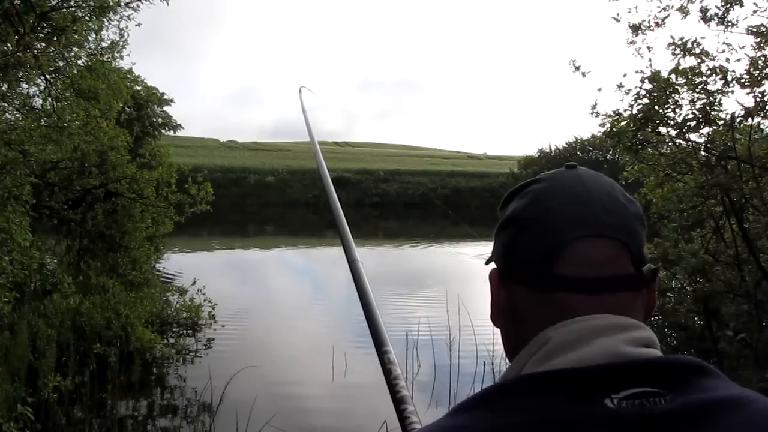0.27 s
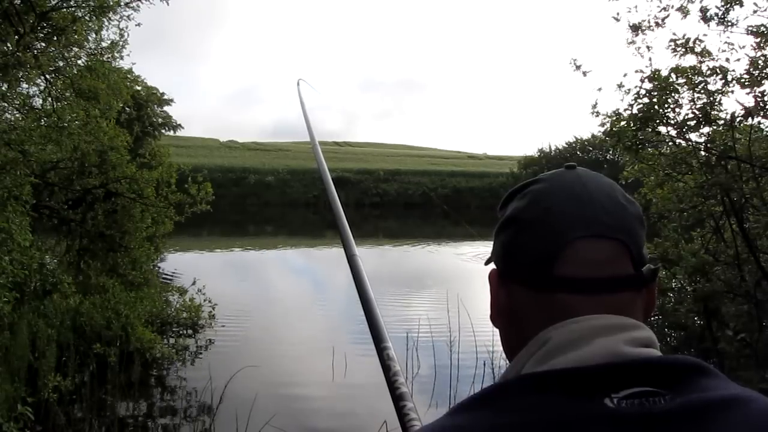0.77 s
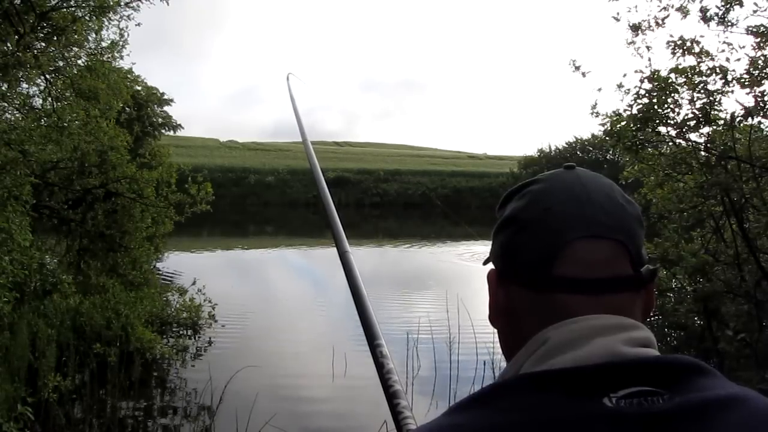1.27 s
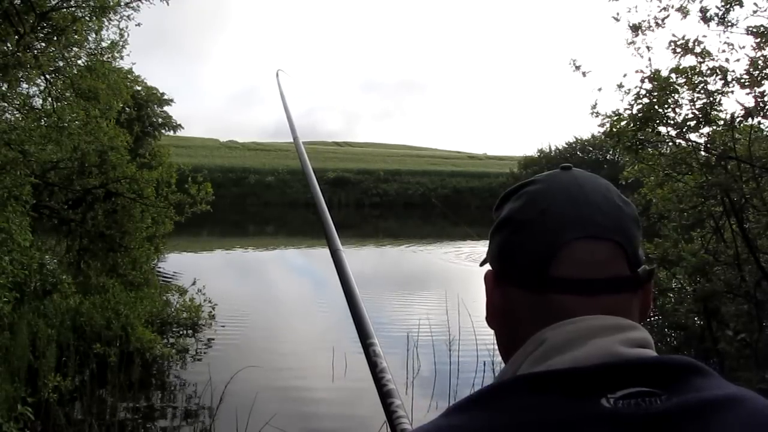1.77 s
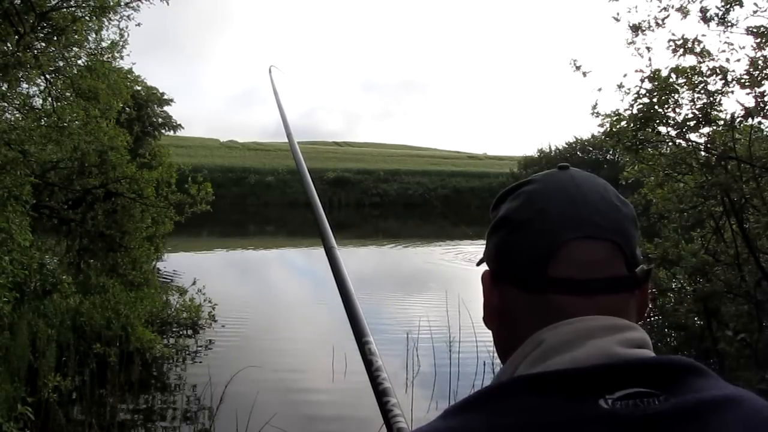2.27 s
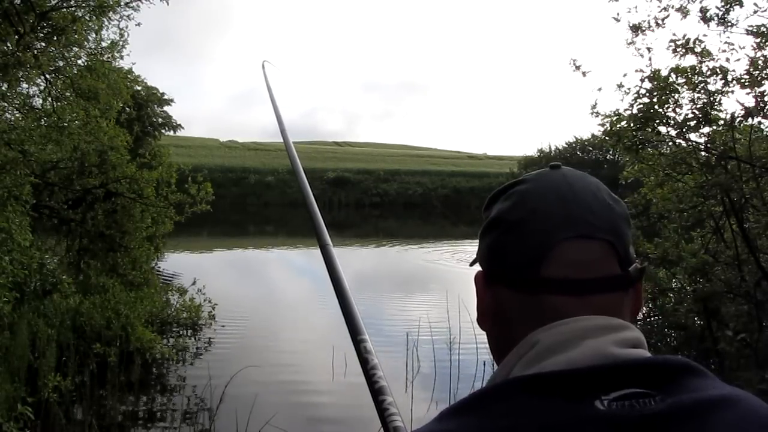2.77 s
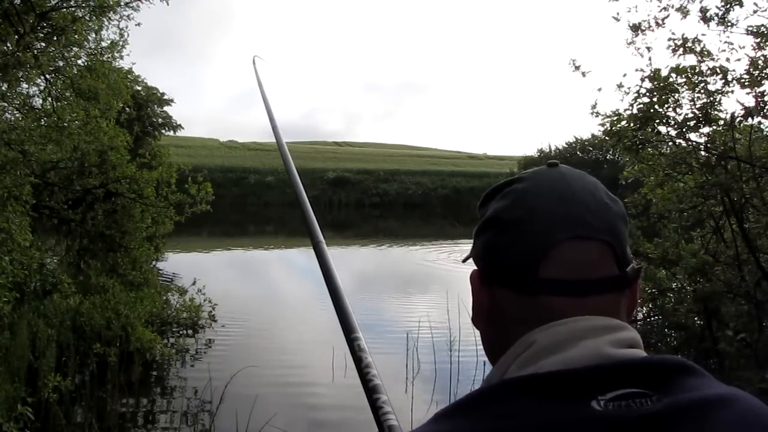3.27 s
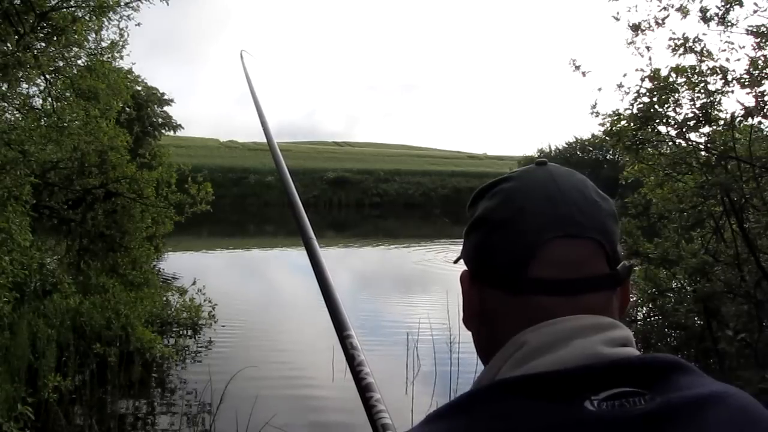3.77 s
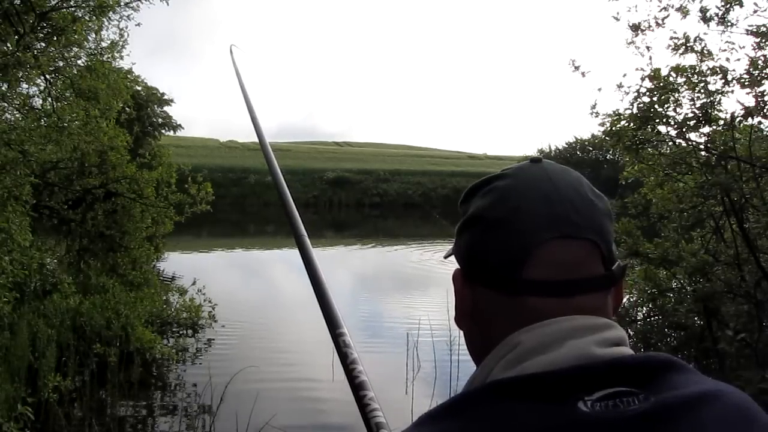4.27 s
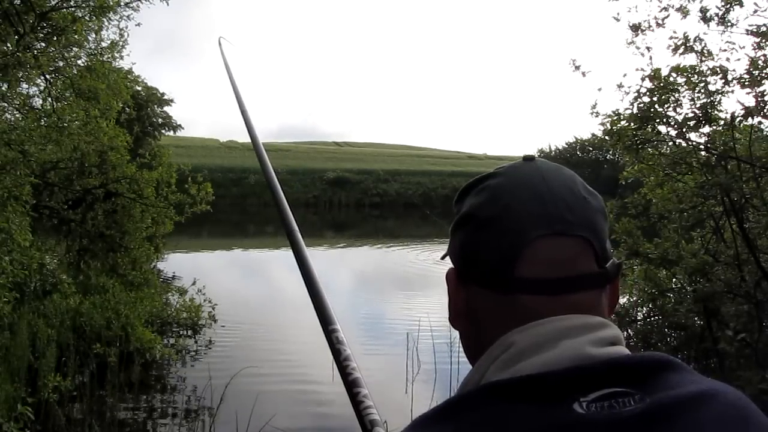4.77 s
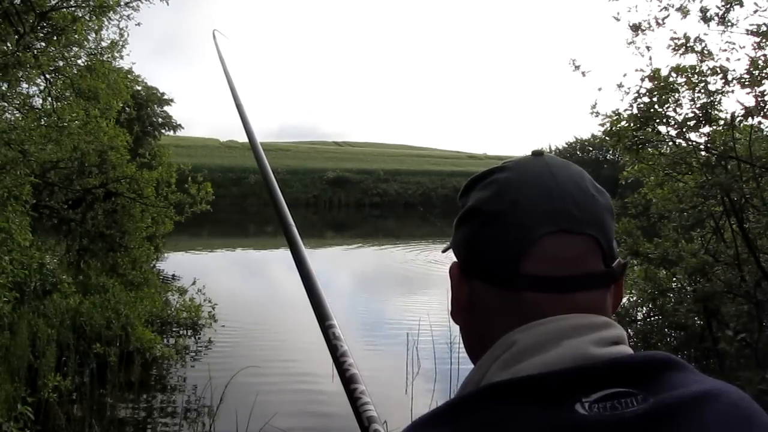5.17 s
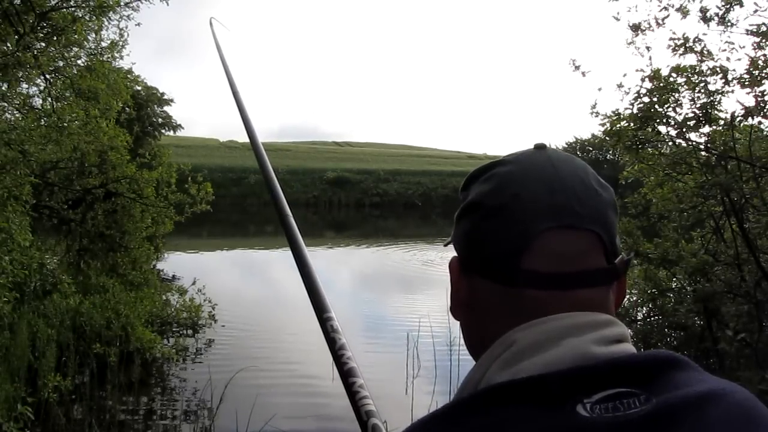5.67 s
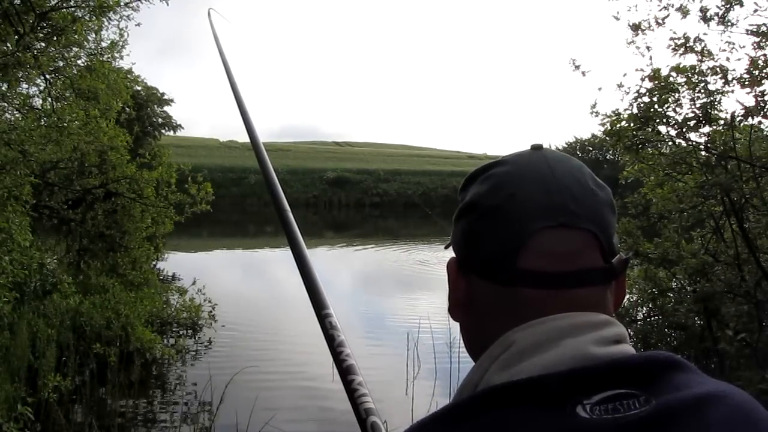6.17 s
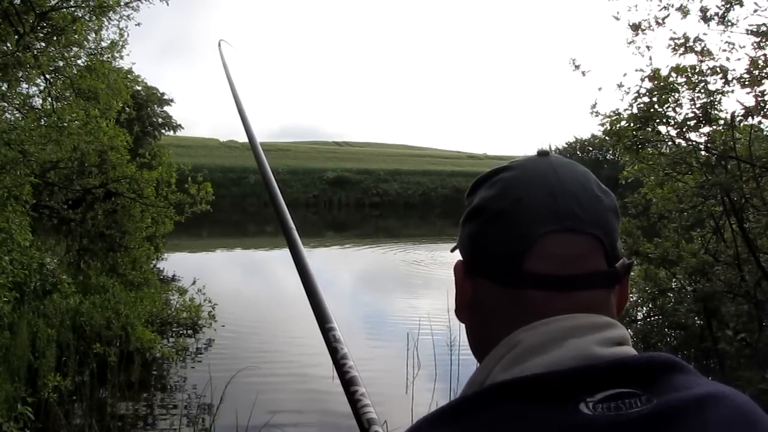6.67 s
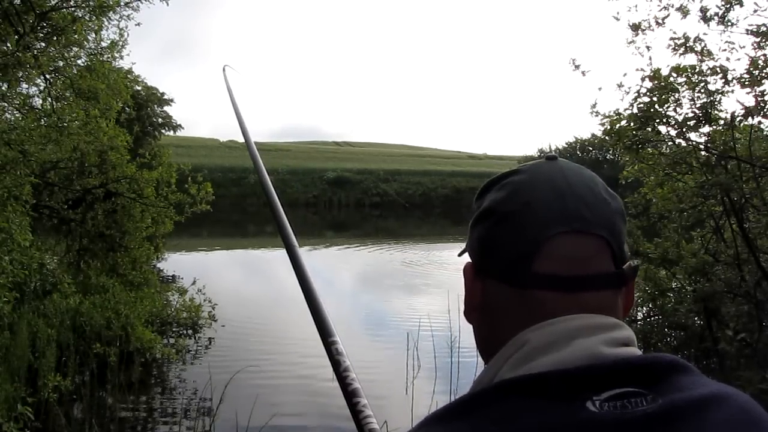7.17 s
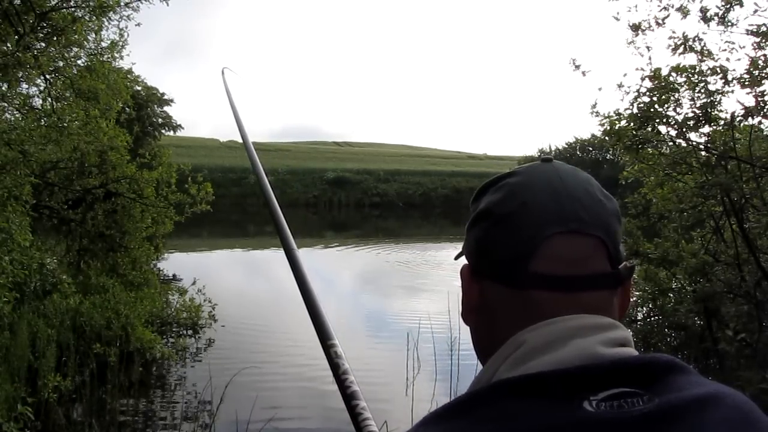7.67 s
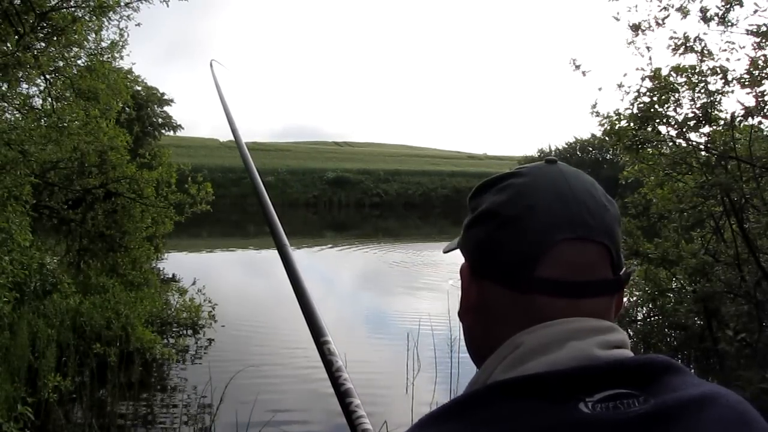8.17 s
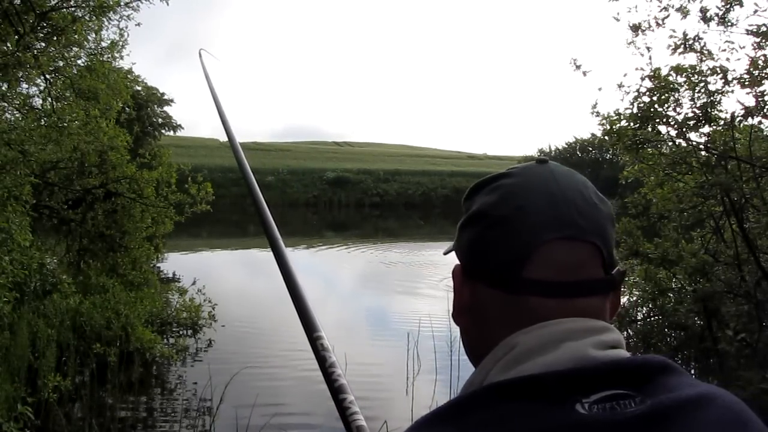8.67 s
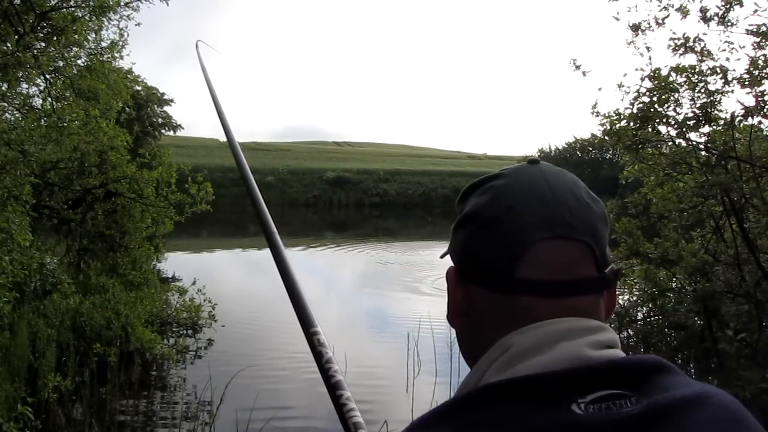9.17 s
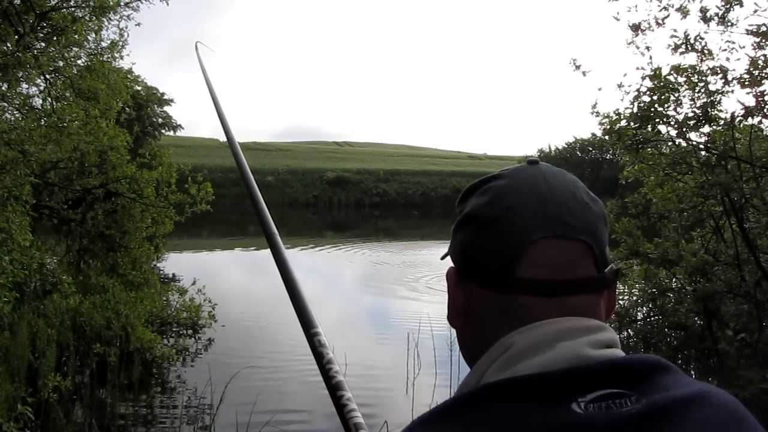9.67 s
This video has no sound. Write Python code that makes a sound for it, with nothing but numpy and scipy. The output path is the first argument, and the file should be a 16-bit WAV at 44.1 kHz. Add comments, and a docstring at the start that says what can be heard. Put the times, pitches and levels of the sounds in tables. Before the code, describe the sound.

Outdoors by a tree-lined pond, a skylark keeps up quick chips, buzzes and sliding whistles while a great tit alternates two notes and a blackbird flutes far off. At about six seconds bait slaps the water in a short crackling shower with small plops. Then a warbler sings louder and nearer on the right. Soft distant air and faint traffic lie beneath, in wide natural stereo.

```python
"""A skylark pours out buzzes and sweeps: near-pure tones whose pitch bends and whose buzzes are modulated.
A warbler sings close by on the right, a great tit alternates two whistles and a blackbird flutes far off, all
by the same tone model; random echoes stand for leaves and the far bank. Bait patters into the water as noise
bursts, droplet clicks and ringing air pockets. Filtered noise and faint drones make the distant air and traffic."""
import sys
import numpy as np
from scipy import signal
from scipy.fft import rfft, irfft, next_fast_len
from scipy.io import wavfile
from scipy.ndimage import map_coordinates

SR = 44100
rng = np.random.default_rng(int(sys.argv[2]) if len(sys.argv) > 2 else 0)


def materialize(psi):
    """Save the field psi as 16-bit PCM at rate SR to the path in sys.argv[1].

    A 1-D psi becomes a single channel; in a 2-D psi each row is a channel.
    """
    bounded = np.clip(np.atleast_2d(psi).T, -1, 1)
    quanta = np.round(bounded * 32767).astype(np.int16)
    wavfile.write(sys.argv[1], SR, quanta)


N = 437913
TIME = np.arange(N) / SR
TOP_HZ = 15700

# Levels in the tables are relative: each source applies its own gains, and echoes, afterwards.
# Spectrum of distant air and traffic: (frequency [Hz], relative density [dB])
AIR_SPECTRUM = [(15, -30), (28, -6), (55, 1.5), (90, -1.5), (135, -2), (230, -7), (480, -2), (1180, 1),
                (1420, -4), (2200, -7), (5200, -11.5), (6200, -17), (10500, -21.5), (15500, -29)]
# Stereo width of the air: (frequency [Hz], side minus mid [dB])
AIR_WIDTH = [(60, -11.5), (200, -6), (400, -9), (700, -5.5), (1300, -3), (2400, -2.5), (4400, 5),
             (8000, -1), (15000, -0.5)]
# Far engines: (start [s], end [s], frequency [Hz], level [dB], frequency wander [Hz])
DRONES = [(-1, 1.8, 256, -56.5, 1), (6.5, 9.9, 68, -52, 2.87), (1.5, 13, 1230, -57, 2.8),
          (2, 10.3, 990, -59, 4.1)]

# Thrushes in the far woods, level over time: (time [s], level [dB])
FAR_WOODS_LEVEL = [(0, -46), (2.6, -50), (3.3, -82), (4.8, -62), (5.3, -48.5), (7, -43.5), (8.3, -49.5),
                   (9.9, -45.5)]
# Small birds repeating one pip:
# (time [s], pips [count], rate [1/s], start pitch [Hz], middle pitch [Hz], end pitch [Hz], level [dB])
PIP_RUNS = [(9.175, 5, 11.8, 5800, 5500, 5500, -48.5), (9.54, 3, 15, 4200, 5400, 4100, -55),
            (4.2, 2, 6, 3900, 5500, 3100, -54), (4.785, 3, 4.8, 6000, 5700, 5800, -54),
            (2.1, 5, 36, 2750, 2620, 2400, -41)]

# Distant blackbird, its clearest notes: (time [s], length [s], pitch [Hz], level [dB])
BLACKBIRD_NOTES = [(1.01, 0.16, 1887, -42.5), (1.128, .1, 3077, -43.5), (1.25, 0.052, 2500, -40.5),
                   (1.339, .076, 2900, -36.5), (1.408, 0.056, 3210, -39), (1.489, .038, 2567, -37.5),
                   (1.52, 0.092, 2810, -38), (2.15, 0.12, 2815, -41), (5.235, 0.053, 1804, -44),
                   (5.344, .035, 2326, -38.5), (7.403, .28, 2280, -44.5), (8.228, 0.045, 2700, -39),
                   (8.312, 0.065, 1978, -43), (9.544, 0.03, 1800, -39.5)]
# Its softer fluting phrases: (start [s], end [s], central pitch [Hz], level [dB])
BLACKBIRD_PHRASES = [(.15, .7, 2300, -46.5), (1.95, 2.5, 1944, -46), (2.95, 3.5, 2530, -45.5),
                     (7.15, 8.15, 1847, -47.5), (8.8, 9.25, 1996, -44.5)]

# Great tit, low and high whistles in turn:
# (time [s], notes [count], first note [0 low, 1 high], low note level [dB], high note level [dB])
TIT_PHRASES = [(.15, 7, 0, -34, -36.5), (6.625, 11, 1, -33.5, -39)]
TIT_LOW_HZ, TIT_HIGH_HZ = 3773, 5284
TIT_PAIR_S, TIT_HIGH_DELAY_S, TIT_LOW_S, TIT_HIGH_S = .372, .147, 0.0786, 0.069

# Lumps of bait slapping the water:
# (time [s], peak level [dB], starting ring [Hz], level of the drops that follow [dB])
SLAPS = [(6.021, -13.5, 1940, -43.5), (6.162, -30, 1700, -32), (6.273, -17, 1880, -29),
         (6.364, -21.5, 1520, -36), (6.389, -17, 1980, -34), (6.421, -18, 3000, -38),
         (6.543, -28, 2530, -48), (6.640, -17, 2500, -30.5), (6.654, -25, 2430, -47)]
# Air pockets ringing in the water: (time [s], starting pitch [Hz], peak level [dB])
PLOPS = [(6.021, 1090, -30), (6.161, 1614, -22), (6.176, 390, -31.5), (6.196, 320, -35), (6.27, 446, -33),
         (6.286, 386, -36), (6.362, 1370, -22), (6.421, 530, -33), (6.596, 460, -30.5), (8.89, 577, -29.5)]
# Spectrum of the slap's noise burst: (frequency [Hz], gain [dB])
SLAP_COLOUR = [(200, -23), (600, -16), (1000, 0.5), (2400, 5.5), (3800, -1), (6000, -17), (15000, -32)]
# Spectrum of the falling drops: (frequency [Hz], relative gain [dB])
SPLASH_COLOUR = [(150, -52), (320, -4), (700, -1.5), (1500, 3.5), (2500, 3.5), (4000, -4), (7000, -50),
                 (15000, -37)]
# Spectrum of the fine spray: (frequency [Hz], relative gain [dB])
SPRAY_COLOUR = [(1500, -17), (4000, -1), (6500, -0.5), (10000, -6), (15000, -16)]
DROPS_DECAY_S, PLOP_S = 0.019, 0.037
# The cloud of loose crumbs lands in one swell; the spray peaks briefly within it.
CRUMBS_AT_S, CRUMBS_SPREAD_S, CRUMBS_DB = 6.395, 0.16, -33
SPRAY_AT_S, SPRAY_SPREAD_S, SPRAY_DB, SPRAY_BURST_DB = 6.402, 0.02, -9.5, 11.5

# Near warbler, plain notes: (time [s], length [s], pitch [Hz], glide [octaves], level [dB])
WARBLER_NOTES = [(7.864, .018, 2800, 0.5, -27.5), (7.876, 0.091, 2900, -0.046, -26),
                 (7.968, 0.067, 2230, -1.1, -28), (8.764, 0.016, 2200, 0.26, -31),
                 (8.782, .016, 2810, -0.27, -22.5), (8.966, .036, 2553, -0.016, -20),
                 (9.796, 0.021, 5120, 0.26, -32), (9.848, 0.092, 2545, .02, -20)]
# Its scratchy notes: (time [s], length [s], pitch [Hz], glide [octaves], level [dB], warble rate [Hz])
WARBLER_BUZZES = [(8.6, 0.052, 6000, 0, -34, 139), (8.673, 0.053, 5900, -0.041, -33.5, 142),
                  (8.802, .1, 4050, .7, -30, 133.5), (8.997, .032, 2340, -.14, -28, 210),
                  (9.025, .036, 2806, 0.46, -28, 192), (9.055, .046, 3520, 0.09, -27, 165),
                  (9.6, 0.052, 2210, -.06, -25, 76.4)]
# Its hooked note, down and up again:
# (delay [s], length [s], start pitch [Hz], middle pitch [Hz], end pitch [Hz])
HOOK = [(0, .039, 3400, 2650, 3600)]
# Occurrences of the hooked note: (time [s], level [dB])
HOOK_CALLS = [(7.372, -31.5), (8.342, -24.5), (8.495, -24)]
# Its trill, loud falling chips with a soft lead-in between:
# (time [s], chips [count], rate [1/s], start pitch [Hz], middle pitch [Hz], end pitch [Hz], level [dB])
WARBLER_TRILL = [(9.183, 4, 11.93, 3910, 2740, 2170, -23), (9.25, 3, 11.7, 3310, 2880, 2720, -35)]
# Colour of its voice, weak below 2 kHz: (frequency [Hz], gain [dB])
WARBLER_COLOUR = [(1500, -11), (2200, 2), (2700, 0.5), (3300, 2.5), (4000, 1), (5500, 2.5)]
SCRATCH_DEPTH_HZ, SCRATCH_AT_HZ, SCRATCH_POWER = 511, 4360, 1.84  # the warble widens with pitch

# Skylark chips, all one quick downward flick: (time [s], pitch [Hz], level [dB])
CHIPS = [(.056, 4850, -38.5), (.655, 3330, -35.5), (.78, 3310, -33.5), (1.815, 4820, -36.5),
         (1.897, 4380, -31), (2.012, 4500, -37.5), (2.11, 4680, -39), (2.5, 3580, -36), (3.345, 3750, -35),
         (3.665, 3290, -37.5), (4.58, 4700, -36), (4.692, 4790, -37), (8.455, 4400, -36),
         (9.773, 4480, -34)]
CHIP_S, CHIP_OCTAVES = .023, -0.492
# Stretches of softer chips at chance moments: (start [s], end [s], central pitch [Hz], level [dB])
SOFT_CHIPS = [(2.2, 2.7, 3185, -37.5), (3.35, 4.1, 3910, -43.5), (4.48, 5.1, 4200, -41)]
# Skylark slurred whistles: (time [s], length [s], pitch [Hz], glide [octaves], level [dB])
SLURS = [(0.322, 0.076, 3730, -0.47, -41.5), (1.15, 0.071, 3690, -.06, -42), (0.863, .1, 4340, -0.45, -39),
         (1.961, 0.14, 3284, 0.1, -36.5), (2.212, .16, 3850, 0.26, -39), (2.364, .06, 3340, -0.21, -35.5),
         (2.46, 0.019, 3900, -0.072, -34.5), (2.865, .12, 3430, 0.46, -36.5),
         (2.878, 0.025, 2505, 0.31, -32.5), (3.162, 0.023, 2600, 0.64, -35.5),
         (3.874, .089, 3590, -.46, -41.5), (4.022, .062, 3450, -.5, -46.5),
         (4.189, .125, 4013, -.27, -40.5), (5.031, .025, 4430, .03, -39), (5.05, .072, 3540, -.4, -41.5),
         (6.139, 0.072, 3980, -.63, -36), (6.451, 0.053, 3630, -.32, -30.5), (7.69, 0.025, 5600, 0.16, -37),
         (1.988, 0.042, 6230, 0.18, -40.5), (2.744, .055, 5360, 0.11, -40.5),
         (5.313, .04, 2620, -.28, -39.5), (6.203, .04, 2980, -0.356, -34), (6.76, 0.036, 5500, -0.047, -38)]
# Skylark slow rough churrs: (time [s], length [s], pitch [Hz], glide [octaves], level [dB])
CHURRS = [(3.6, .23, 3560, -0.092, -42), (4.762, .1, 3250, 0.276, -37), (4.83, 0.116, 3770, .08, -34.5)]
CHURR_DEPTH_HZ, CHURR_RATE_HZ = 189, 46
# Skylark trills of steep upward chirps:
# (time [s], chirps [count], rate [1/s], start pitch [Hz], middle pitch [Hz], end pitch [Hz], level [dB])
LARK_TRILLS = [(.158, 5, 33, 3900, 4470, 4930, -41.5), (5.983, 5, 34.3, 2930, 4430, 4950, -30.5),
               (7.5, 6, 42, 3270, 3970, 4500, -43)]
# Arched call, a buzz that climbs, crests and falls in a slur while a second voice rises to meet it:
# (delay [s], length [s], start [Hz], middle [Hz], end [Hz], optional warble depth [Hz], warble rate [Hz])
ARCH = [(0, 0.28, 4655, 4897.5, 5060, 130, 70), (.088, 0.127, 5090, 5240, 5200, 110, 78),
        (.2, .063, 5200, 4450, 3780), (.175, .1, 2950, 3470, 3850)]
# Arched calls: (time [s], climb level [dB], crest level [dB], slur level [dB], second voice level [dB])
ARCH_CALLS = [(5.57, -38, -34.5, -36.5, -35.5), (7.055, -41, -34, -36, -39),
              (7.435, -35.5, -32.5, -38.5, -37)]
# Dipping call, a buzz that drops and then levels out:
# (delay [s], length [s], start [Hz], middle [Hz], end [Hz], warble depth [Hz], warble rate [Hz])
DIP = [(0, .066, 5320, 4770, 4650, 210, 72), (.063, 0.139, 4610, 4430, 4410, 83, 70.5)]
# Dipping calls: (time [s], drop level [dB], level part level [dB])
DIP_CALLS = [(.58, -36, -37), (2.635, -29, -35), (3.1, -36, -34.5), (5.228, -38, -34)]
# Lifting call, a short nearly level note and then a fine buzz that rises and flattens:
# (delay [s], length [s], start [Hz], middle [Hz], end [Hz], warble depth [Hz], warble rate [Hz])
LIFT = [(0, .077, 4460, 4500, 4560, 22, 70), (.053, .25, 4720, 5045, 5140, 100, 71.8)]
# Lifting calls: (time [s], level note level [dB], buzz level [dB])
LIFT_CALLS = [(1.375, -32, -29.5), (4.01, -45, -42)]


def undb(db):
    """Logarithmic level: decibels to amplitude gain."""
    return 10 ** (np.asarray(db) / 20)


def unit(x):
    """Normalisation: scale to an rms of 1."""
    return x / np.sqrt(np.mean(x ** 2))


def add(track, s, sound):
    """Superposition: mix a sound into a track at time s."""
    i = max(int(s * SR), 0)
    n = max(min(len(sound), N - i), 0)
    track[i:i + n] += sound[:n]


def walk(rate, size=N):
    """Random modulation: straight lines between random knots, rate per second, with spread near 1."""
    knots = rng.standard_normal(4096)
    return 1.164 * map_coordinates(knots, [np.arange(size) / SR * rate], order=1, mode="wrap")


def swell(at_s, spread_s):
    """Gaussian envelope: a bell-shaped rise and fall in time."""
    return np.exp(-((TIME - at_s) / spread_s) ** 2 / 2)


def colour(x, points):
    """Linear filtering: weight the spectrum by (Hz, dB) points joined on a log-frequency axis."""
    hz, db = np.transpose(points)
    size = next_fast_len(N + 4096)
    f = np.maximum(np.fft.rfftfreq(size, 1 / SR), 1)
    gain = undb(np.interp(np.log(f), np.log(hz), db))
    return irfft(rfft(x, size) * gain, size)[..., :N]


def ports(x, lag_ms, pan_db):
    """Time and level differences at two spaced microphones: the left hears lag_ms later and pan_db louder."""
    size = next_fast_len(N + 4096)
    delay = np.exp(-2j * np.pi * np.fft.rfftfreq(size, 1000 / SR) * lag_ms)
    left = irfft(rfft(x, size) * delay, size)[:N]
    return np.array([left * undb(pan_db / 2), x * undb(-pan_db / 2)])


def woodland(x, leaves_db, leaves_t60, bank_db, bank_t60):
    """Multiple scattering: sparse echoes from near branches, then a diffuse tail from trees round the pond."""
    t = np.arange(SR) / SR
    sparse = rng.standard_normal((2, SR)) * (rng.random((2, SR)) < .03)
    twigs = sparse * (t > .004) * undb(-60 * t / leaves_t60)
    tail = rng.standard_normal((2, SR)) * np.minimum(t / .03, 1) * undb(-60 * t / bank_t60)
    response = (undb(leaves_db) * unit(twigs) + undb(bank_db) * unit(tail)) / np.sqrt(SR)
    return signal.fftconvolve(x[None], response, axes=1)[:, :N]


def song(notes, edge_s, waver, throb=0., arch=0.11):
    """Syrinx as modulated oscillator: a tone bends through three pitches; a buzz pulses pitch and loudness."""
    track = np.zeros(N)
    for s, length, start, middle, end, db, *warble in notes:
        depth, rate = warble or (0, 0)
        t = np.arange(int(length * SR)) / SR
        u = t / length
        swing = 2 * np.pi * rate * (t + .0007 * walk(30, size=len(t)))
        # a falling buzz settles into a purer whistle
        buzz = 1 - .7 * u ** 2 * (end < start)
        bend = np.polyfit([0, .5, 1], [start, middle, end], 2)
        hz = np.polyval(bend, u) * (1 + waver * walk(121.9, size=len(t)))
        hz = hz + np.sign(end - start) * buzz * depth * np.sin(swing)
        # the release is twice as quick as the attack
        gate = np.sin(np.pi / 2 * np.clip(np.minimum(t, 2 * (length - t)) / edge_s, 0, 1))
        effort = gate * (1 - arch + arch * np.sin(np.pi * u)) * (1 - throb * buzz * np.cos(swing))
        add(track, s, undb(db) * unit(effort) * np.sin(2 * np.pi * np.cumsum(hz) / SR))
    return track


def repeats(runs, duty):
    """Periodic repetition: spell out runs of one note sounding for a share duty of each period."""
    return [(s + k / rate, duty / rate, *shape)
            for s, count, rate, *shape in runs
            for k in range(int(round(count)))]


def calls(motif, rows):
    """Motif repetition: sing the motif at each row's time, with that row's level for each note."""
    return [(s + delay, length, start, middle, end, db, *warble)
            for s, *levels in rows
            for (delay, length, start, middle, end, *warble), db in zip(motif, levels)]


def glides(rows, bow):
    """Frequency glide: slide through so many octaves about the pitch, the middle raised by a share bow."""
    return [(s, length, hz * 2 ** (-octaves / 2), hz * (1 + bow), hz * 2 ** (octaves / 2), db, *warble)
            for s, length, hz, octaves, db, *warble in rows]


def improvise(phrases, gap_s, length_s, range_octaves, glide_octaves, count=24):
    """Random sequence: fill each phrase with loosely spaced notes scattered round its pitch."""
    rows = []
    for start, end, hz, db in phrases:
        for k, (late, span, pitch, slide) in enumerate(rng.random((count, 4))):
            s = start + (k + late / 2) * gap_s
            note_hz = hz * 2 ** (range_octaves * (pitch - .5))
            if s < end:
                rows.append((s, length_s * (.5 + span), note_hz, glide_octaves * (.5 + slide), db))
    return rows


def air():
    """Stereo coherence of filtered noise: far wind and traffic, alike in the bass and wide in the treble."""
    mid, side = rng.standard_normal((2, N))
    side = colour(side, AIR_WIDTH)
    wash = colour(np.array([mid + side, mid - side]), AIR_SPECTRUM)
    sway_db = .3 * walk(2) + .4 * walk(11)
    balance_db = np.array([[-.4], [.4]])  # left, right
    return unit(wash) * undb(-38.5 + sway_db + balance_db)


def engines():
    """Slow frequency and amplitude modulation: faint wavering drones of machines far over the fields."""
    out = np.zeros(N)
    for start, end, hz, db, wander in DRONES:
        fade = np.clip(np.minimum(TIME - start, end - TIME) / 0.56, 0, 1)
        phase = 2 * np.pi * np.cumsum(hz + wander * walk(14)) / SR
        out += np.sqrt(2) * fade * undb(db + 1.6 * walk(4)) * np.sin(phase)
    return out


def far_woods(count=110):
    """Reverberant field: low fluting of many distant thrushes, heard only as echo."""
    notes = []
    for when, span, pitch, glide in rng.random((count, 4)):
        s, hz = when * N / SR, 1750 + 1100 * pitch
        slope = 0.1467 * (glide - .5)
        db = np.interp(s, *np.transpose(FAR_WOODS_LEVEL))
        notes.append((s, 0.0514 + 0.1008 * span, hz * (1 - slope), hz, hz * (1 + slope), db))
    voices = song(notes, edge_s=0.015, waver=0.0235)
    return woodland(voices, leaves_db=1, leaves_t60=0.18, bank_db=4, bank_t60=0.51)


def chorus(count=260):
    """Random superposition: runs of pips and a faint twitter from further birds, heard only as echo."""
    notes = []
    for when, span, pitch, bend, glide, loud in rng.random((count, 6)):
        hz = 2600 + 2600 * pitch
        slope = 0.247 * (glide - .5)
        middle = hz * (1 + 0.0972 * (bend - .5))
        db = -53 + 5 * loud
        notes.append((when * N / SR, 0.0202 + .07 * span, hz * (1 - slope), middle, hz * (1 + slope), db))
    twitter = song(notes, edge_s=.008, waver=.04)
    pips = undb(2.5) * song(repeats(PIP_RUNS, duty=0.23), edge_s=.003, waver=0.01)
    return woodland(twitter + pips, leaves_db=0, leaves_t60=.1, bank_db=-1, bank_t60=.8)


def blackbird():
    """Direct and reverberant sound: low fluting across the water, strongly echoed, each note rising a little."""
    clear = [(s, length, hz, .04, db) for s, length, hz, db in BLACKBIRD_NOTES]
    soft = improvise(BLACKBIRD_PHRASES, gap_s=.2, length_s=0.0797, range_octaves=.3, glide_octaves=0.095)
    voice = song(glides(clear + soft, bow=0), edge_s=0.0032, waver=0.0099)
    direct = ports(voice, lag_ms=-0.097, pan_db=-4.5) * undb(2)
    return direct + woodland(voice, leaves_db=-0.5, leaves_t60=0.27, bank_db=-0.5, bank_t60=1.)


def great_tit():
    """Alternating tones in a scattering medium: two whistles in turn from inside the trees, each ringing on."""
    notes = []
    for s, count, first, *levels in TIT_PHRASES:
        for k in range(int(round(count))):
            high = (k + int(round(first))) % 2
            length = (TIT_LOW_S, TIT_HIGH_S)[high]
            hz = (TIT_LOW_HZ, TIT_HIGH_HZ)[high]
            notes.append((s, length, hz, 0, levels[high]))
            s += TIT_PAIR_S - TIT_HIGH_DELAY_S if high else TIT_HIGH_DELAY_S
    voice = song(glides(notes, bow=0), edge_s=0.0061, waver=0.0082)
    direct = ports(voice, lag_ms=.09, pan_db=-3) * undb(2.0)
    return direct + woodland(voice, leaves_db=2.5, leaves_t60=0.18, bank_db=-3.5, bank_t60=1.0)


def bubble(hz, cycles, rise):
    """Bubble resonance: an air pocket rings, decays and climbs in pitch as it nears the surface."""
    u = np.linspace(0, 1, int(cycles / hz * SR) + 2)
    return np.sin(2 * np.pi * cycles * (u + rise * u * u / 2)) * np.exp(-4 * u) * (1 - u ** 4)


def patter(spread_db):
    """Random impulse process: dense droplet clicks of unequal size and random sign."""
    hits = rng.random(N) < .025
    size = undb(spread_db * np.minimum(rng.exponential(size=N), 4))
    return hits * size * rng.choice([-1, 1], N)


def bait(count=130):
    """Impact and bubble sound: lumps slap the surface and trap air; crumbs shower and throw up spray."""
    power = undb(CRUMBS_DB) ** 2 * swell(CRUMBS_AT_S, CRUMBS_SPREAD_S) ** 2
    fizz, cracks, pockets = np.zeros((3, N))
    for when, size, ring, loud in rng.random((count, 4)):
        pop = undb(-9.5 + 12.6 * loud) * bubble(600 * 6 ** size, 10 + 20 * ring, rise=0.46)
        add(fizz, CRUMBS_AT_S + .68 * (when - .5), pop)
    t = np.arange(SR // 20) / SR
    for when, db, hz, drops_db in SLAPS:
        add(cracks, when, undb(db - 1.5) * rng.standard_normal(len(t)) * np.exp(-t / 0.0036))
        add(pockets, when, undb(db) * bubble(hz, 8.3, rise=0.13))
        add(power, when, (undb(drops_db) * np.exp(-TIME[:SR] / DROPS_DECAY_S)) ** 2)
    for when, hz, db in PLOPS:
        add(pockets, when, undb(db) * bubble(hz, hz * PLOP_S, rise=0.36))
    drops = unit(colour(patter(spread_db=4.0), SPLASH_COLOUR))
    spray_db = SPRAY_DB + SPRAY_BURST_DB * swell(SPRAY_AT_S, SPRAY_SPREAD_S)
    spray = undb(spray_db) * unit(colour(patter(spread_db=2.5), SPRAY_COLOUR))
    # slaps and crumbs add as powers, whose root is the amplitude of the shower
    shower = np.sqrt(power) * (drops + spray + fizz)
    water = colour(cracks, SLAP_COLOUR) + pockets + shower
    direct = ports(water, lag_ms=0.026, pan_db=-2.5) * undb(1)
    return direct + woodland(water, leaves_db=-6, leaves_t60=0.1, bank_db=-10.5, bank_t60=1.0)


def warbler():
    """Source and filter: loud notes in the bush on the right swell in their middle, then a filter colours them."""
    notes = glides(WARBLER_NOTES, bow=0.0077) + calls(HOOK, HOOK_CALLS) + repeats(WARBLER_TRILL, duty=.27)
    buzzes = []
    for s, length, hz, octaves, db, rate in WARBLER_BUZZES:
        depth = SCRATCH_DEPTH_HZ * (hz / SCRATCH_AT_HZ) ** SCRATCH_POWER
        buzzes.append((s, length, hz, octaves, db, depth, rate))
    plain = song(notes, edge_s=0.0056, waver=.015, arch=0.49)
    scratchy = song(glides(buzzes, bow=.015), edge_s=0.0072, waver=.035, throb=0.59, arch=0.35)
    voice = colour(plain + scratchy, WARBLER_COLOUR)
    direct = ports(voice, lag_ms=0.069, pan_db=-4.8) * undb(-1)
    return direct + woodland(voice, leaves_db=-3.5, leaves_t60=0.17, bank_db=-12.5, bank_t60=1.0)


def skylark():
    """Frequency and amplitude modulation: chips, slurs, churrs, trills and fast buzzes high over the field."""
    chips = [(s, CHIP_S, hz, CHIP_OCTAVES, db) for s, hz, db in CHIPS]
    chips += improvise(SOFT_CHIPS, gap_s=.12, length_s=.028, range_octaves=0.81, glide_octaves=-0.336)
    sweeps = undb(2.5) * song(glides(chips + SLURS, bow=0.0112), edge_s=0.0014, waver=.012)
    motifs = calls(ARCH, ARCH_CALLS) + calls(DIP, DIP_CALLS) + calls(LIFT, LIFT_CALLS)
    buzzes = song(motifs, edge_s=.008, waver=.004, throb=.6)
    rough = [(*row, CHURR_DEPTH_HZ, CHURR_RATE_HZ) for row in CHURRS]
    churrs = song(glides(rough, bow=.03), edge_s=.008, waver=.05, throb=0.42)
    trills = song(repeats(LARK_TRILLS, duty=0.51), edge_s=0.0026, waver=0.0087)
    sliding = sweeps + churrs
    pulsed = buzzes + trills
    # the pulsed sounds arrive mostly direct, the sliding ones with more echo
    echo = woodland(pulsed, leaves_db=-7, leaves_t60=.1, bank_db=-10, bank_t60=.8)
    echo = echo + woodland(sliding, leaves_db=-0.5, leaves_t60=.1, bank_db=-6, bank_t60=1.0)
    direct = ports(pulsed, lag_ms=-.06, pan_db=3) * undb(1.5)
    direct = direct + ports(sliding, lag_ms=-0.09, pan_db=-2) * undb(0.5)
    return direct + echo


def scene():
    """Linear superposition: everything heard from the bank."""
    background = air() + engines() + far_woods() + chorus()
    return background + blackbird() + great_tit() + bait() + warbler() + skylark()


def record(dry):
    """Band limitation: a steep elliptic low-pass cuts the top."""
    return signal.sosfilt(signal.ellip(10, .2, 80, TOP_HZ, fs=SR, output="sos"), dry)


dry = scene()
out = record(dry)
materialize(out)
```